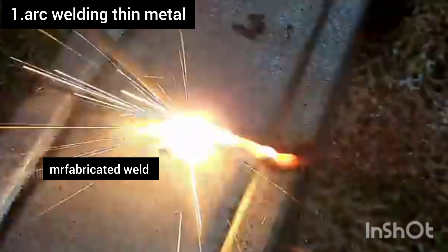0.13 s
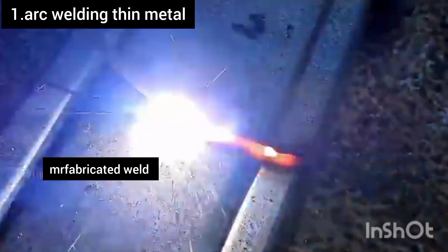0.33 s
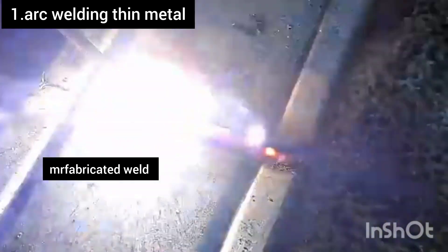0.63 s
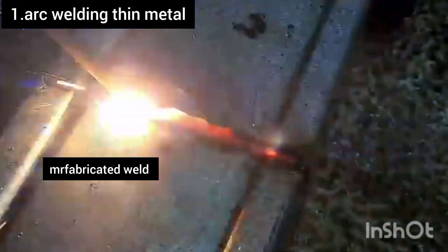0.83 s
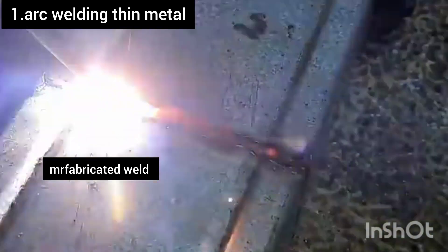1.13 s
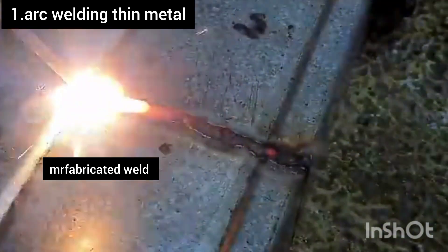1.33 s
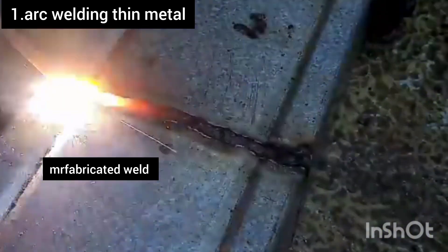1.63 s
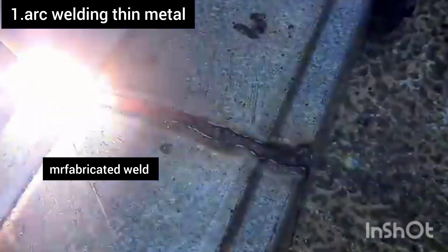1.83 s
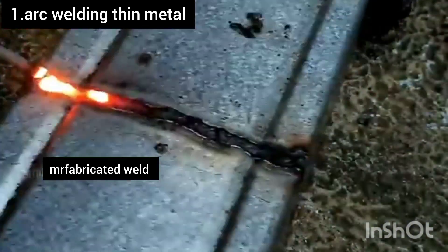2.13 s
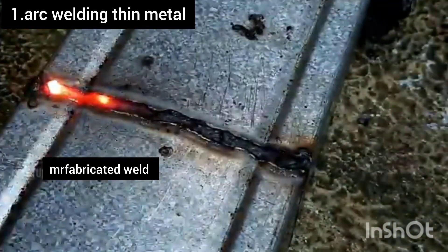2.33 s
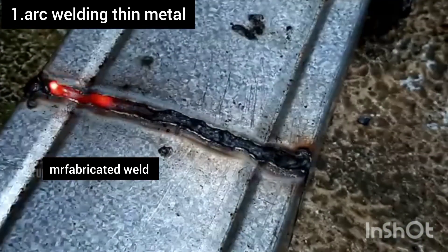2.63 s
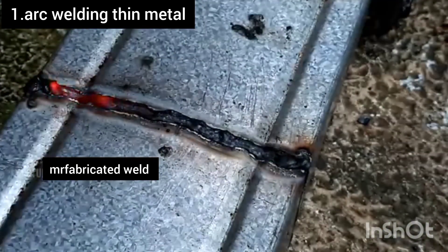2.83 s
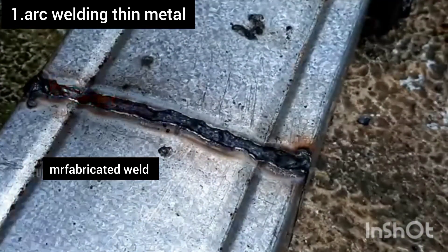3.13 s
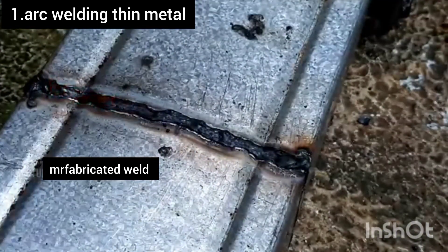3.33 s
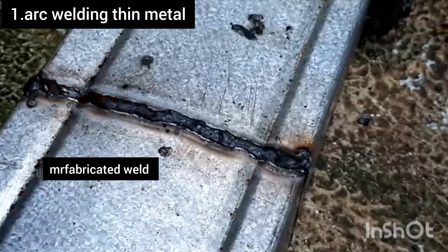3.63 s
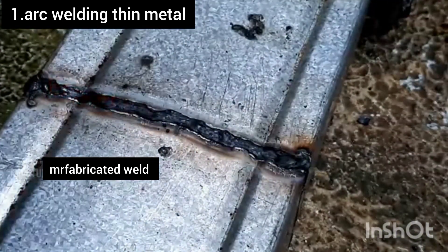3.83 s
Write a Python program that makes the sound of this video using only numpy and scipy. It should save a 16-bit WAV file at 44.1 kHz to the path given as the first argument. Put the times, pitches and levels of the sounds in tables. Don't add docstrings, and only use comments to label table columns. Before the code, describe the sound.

A welding arc sputters in sharp irregular bursts close to the microphone for two seconds, cuts off, scrapes and flashes once more, then a low fan rush rises with a double knock and tiny ticks.

```python
import sys
import numpy as np
from scipy import signal
from scipy.fft import rfft, irfft
from scipy.io import wavfile
from scipy.ndimage import uniform_filter1d, map_coordinates

SR = 44100
rng = np.random.default_rng(int(sys.argv[2]) if len(sys.argv) > 2 else 0)


def boost_factor(decibels):
    exponent = np.asarray(decibels, float) / 20
    return 10 ** exponent


def store_pcm(level_fs):
    pcm = np.round(np.clip(level_fs, -1, 1) * 32767).astype(np.int16)
    wavfile.write(sys.argv[1], SR, np.atleast_2d(pcm).T)


N = 176400
T = np.arange(N) / SR

# t/s, delay/ms
ARC_LAG = [(0, 0.13), (.3, .126), (.6, 0.138), (1.1, 0.152), (2.2, 0.156)]


def arc():
    # f/Hz, level/dB
    crackle_shape = [(1200, -29), (2800, -20), (4300, -1), (5600, -1.5), (8300, -2.5), (9500, 0),
                     (15300, -6.5), (16300, -68)]
    roar_shape = [(25, -13.5), (100, -1.5), (400, 1), (1000, -7.5), (1600, -7.5), (2700, -7), (3600, 6),
                  (5000, -78)]
    # f/Hz, coherence/1
    arc_same = [(30, 0.94), (200, 0.81), (3500, 0.68), (6000, 0.79), (15000, 0.1)]
    # f/Hz, level/dB
    arc_tilt = [(30, 3), (300, -1.5), (15000, 2.5)]
    sparks_per_s, spark_spread_db, spark_share = 7000, 2.5, 0.39
    roar_db, roar_end_s, roar_follows = -40, 1.975, 0.11

    level = effort()
    struck = rng.random(N) < sparks_per_s / SR
    sparks = boost_factor(spark_spread_db * np.minimum(rng.exponential(1, N), 4)) * struck
    signs = rng.choice([-1., 1.], (2, N))
    hiss = rng.standard_normal((2, N))
    grit = spark_share * evened(sparks) * signs + (1 - spark_share) * hiss
    crackle = evened(colour(grit, crackle_shape)) * level * boost_factor(2.5 * chance(0.002))

    burning = np.clip((roar_end_s - T) / 0.003, 0, 1) * uniform_filter1d(level, 600) ** roar_follows
    roar = evened(colour(rng.standard_normal((2, N)), roar_shape))
    roar = roar * burning * boost_factor(2.5 * chance(0.0098))

    both = ports(*(crackle + boost_factor(roar_db) * roar), arc_same, ARC_LAG)
    tilt = boost_factor(read(arc_tilt) / 2)
    return irfft(rfft(both) * [tilt, 1 / tilt], N)


def effort():
    # start t/s, length/s, strike level/dB, burn level/dB
    early_bursts = [(0.0289, 0.0062, -24, -52), (0.0374, 0.0092, -36, -32), (0.0554, 0.0032, -40, -38),
                    (0.0688, 0.011, -22, -27.5), (0.1492, 0.024, -33, -34), (0.1961, 0.022, -23.5, -29),
                    (0.2424, 0.0047, -33.5, -30), (0.2928, 0.031, -20.5, -37.5), (0.3193, 0.021, -31, -36),
                    (0.3362, 0.019, -21, -39.5), (0.3677, 0.011, -38, -35.5), (0.3806, 0.011, -47, -35),
                    (0.3901, 0.0087, -34, -27.5), (0.4185, 0.005, -31, -32), (0.434, 0.014, -21, -33),
                    (0.471, 0.028, -40, -31), (0.5035, 0.019, -23.5, -37), (0.5283, 0.023, -21, -35),
                    (0.5662, 0.014, -28, -34.5), (0.6206, 0.01, -25.5, -48), (0.6765, 0.0056, -27, -40),
                    (0.7263, 0.008, -25.5, -51), (0.7348, 0.0081, -50, -48), (0.7583, 0.0059, -34, -32),
                    (0.7957, 0.035, -38, -37)]
    late_bursts = [(0.8231, 0.021, -33, -33), (0.8486, 0.01, -31, -29.5), (0.9288, 0.0043, -33.5, -43),
                   (1.0805, 0.043, -29, -36.5), (1.1545, 0.031, -15.5, -31), (1.2152, 0.012, -31, -27.5),
                   (1.2297, 0.0049, -28, -33), (1.2586, 0.04, -28, -36.5), (1.4756, 0.023, -18.5, -38),
                   (1.5385, 0.0071, -28, -25.5), (1.5535, 0.026, -34, -36.5), (1.5909, 0.014, -28.5, -48),
                   (1.6063, 0.071, -31.5, -40), (1.7001, 0.027, -43.5, -34), (1.7326, 0.0031, -38, -17.5),
                   (1.7445, 0.012, -23, -60), (1.756, 0.011, -25, -29.5), (1.7735, 0.006, -48, -63),
                   (1.7915, 0.012, -23.5, -31.5), (1.807, 0.0096, -40, -31.5), (1.8239, 0.017, -25, -36),
                   (1.8418, 0.03, -43, -34.5), (1.8957, 0.041, -18, -30), (1.9414, 0.029, -15, -31.5),
                   (2.1935, 0.022, -19.5, -33)]
    # start t/s, length/s, strike level/dB, burn level/dB
    spits = [
        (1.3275, .003, -30, -45),
        (1.399, 0.012, -33, -39),
    ]
    # t/s, level/dB
    spatter = [(.0558, -34), (.1366, -29.5), (.2763, -36), (.445, -43), (.4559, -23.5), (.468, -30),
               (.512, -28), (.54, -39), (.551, -40), (.576, -32), (.598, -43), (.6639, -32), (.7103, -31.5),
               (.738, -31.5), (.8011, -33), (.8695, -33), (.8904, -34), (.9168, -44), (1.037, -30),
               (1.0879, -30), (1.108, -32), (1.146, -51), (1.27, -20), (1.287, -31), (1.299, -41),
               (1.3633, -33), (1.4546, -53), (1.486, -35), (1.543, -21.5), (1.62, -40), (1.6417, -28),
               (1.66, -26), (1.684, -35), (1.8725, -25), (1.961, -32)]
    # t/s, level/dB
    sizzle = [(0, -35), (.1, -48), (.14, -44), (.2, -52), (.45, -42.5), (.62, -52.5), (.9, -46), (1.0, -49),
              (1.04, -50), (1.3, -53), (1.35, -60), (1.4, -45.5), (1.65, -51), (1.96, -48), (1.995, -92)]

    snaps = laid(spatter, lambda db: swell(0.0015, 0.0024, db) ** 2)
    bursts = laid(list(early_bursts) + list(late_bursts) + spits, burst)
    steady = boost_factor(curve(sizzle) + 3.5 * chance(0.0041)) ** 2
    return np.sqrt(steady + bursts + snaps)


def burst(length, strike_db, burn_db):
    burn_rise_s, release_s, burn_change_db = 0.0064, 0.0017, -7.5
    t = T[:SR // 8]
    sag_db = burn_change_db * (np.clip(t / length, 0, 1) - 1)
    burn = boost_factor(burn_db + sag_db) * np.clip(t / burn_rise_s, 0, 1)
    power = (burn * np.exp(-np.clip(t - length, 0, 1) / release_s)) ** 2
    add(power, 0, swell(0.002, 0.0022, strike_db) ** 2)
    return power


def rod():
    # f/Hz, level/dB, t60/s
    steel = [(670, 12, 0.031), (1096, 7, 0.034), (1310, 5, 0.02), (1570, 6, .02), (1750, 3, 0.029),
             (2080, -0.5, 0.044), (2090, -19, 0.038), (2637, -7.5, 0.069), (3760, -36, .02)]
    # t/s, level/dB, f/Hz, t60/s
    knocks = [(.823, -35, 78, 0.048), (.8235, -39, 394, 0.031), (1.02, -32, 1140, 0.011),
              (2.195, -32.5, 527, 0.0088), (2.2135, -35, 1240, 0.028), (2.214, -32, 2690, 0.017),
              (2.214, -29, 480, 0.0092), (2.217, -36, 111, 0.033), (3.0262, -18, 610, 0.0096),
              (3.0265, -18.5, 3030, 0.0087), (3.0265, -24.5, 2200, .012), (3.03, -40, 500, 0.033),
              (3.154, -39.5, 1010, 0.015)]
    drag_start_s, sing_hz = 2.137, 1017

    slips = rng.standard_normal(N) * laid([(drag_start_s, 0.016, 0.019, -31)], swell)
    sing = laid([(drag_start_s, 0.024, 0.01, -28)], swell) * np.sin(2 * np.pi * sing_hz * T)
    body = np.diff(sum(ring(db, hz, t60) for hz, db, t60 in steel))
    drag = signal.oaconvolve(slips, body / np.linalg.norm(body))[:N]
    x = drag + sing + laid(knocks, knock)
    return ports(x, x, [(0, 0.72)], ARC_LAG)


def knock(db, hz, t60):
    contact_s = 0.00068
    return -ring(db, hz, t60) * np.minimum(T[:SR // 8] / contact_s, 1)


def ring(db, hz, t60):
    t = T[:SR // 8]
    return boost_factor(db - 60 * t / t60) * np.sin(2 * np.pi * hz * t)


def rustle():
    # start t/s, rise/s, fall/s, level/dB
    puffs = [(2.141, 0.0097, 0.05, -51), (2.5, 0.15, 0.59, -51), (2.64, 0.089, 0.0031, -45.5),
             (2.766, 0.0033, 0.017, -53), (2.838, 0.0028, 0.1, -53.5), (2.955, 0.0088, 0.0047, -50.5),
             (3.102, 0.0011, 0.012, -49), (3.235, .04, 0.038, -48.5), (3.517, 0.0027, 0.021, -47.5),
             (3.672, 0.0073, 0.013, -50), (3.86, 0.0036, 0.014, -53)]
    # f/Hz, level/dB
    rustle_shape = [(1200, -8), (2800, -2.5), (4600, -1.5), (7000, -5), (15300, -7), (16300, -42)]
    # t/s, level/dB, f/Hz
    ticks = [(2.768, -50, 5490), (2.768, -49, 7700), (2.768, -50, 8600), (2.768, -51, 11800),
             (2.768, -57, 13200), (2.768, -59, 14600), (2.958, -55, 5480), (2.958, -59, 8030),
             (2.958, -54, 12360), (3.103, -59, 7900), (3.103, -60, 11800), (3.146, -54, 3030),
             (3.146, -58.5, 5800), (3.142, -60, 12800), (3.518, -56, 10300), (3.518, -60.5, 11800),
             (3.518, -60, 13200), (3.518, -60, 14500), (3.518, -63, 5550), (3.676, -60, 8100),
             (3.676, -57, 13100), (3.676, -60, 14100), (3.862, -47.5, 4540), (3.862, -53, 11780),
             (3.862, -56, 10400)]

    level = laid(puffs, swell) * boost_factor(2.2 * chance(0.0097))
    hiss = evened(colour(rng.standard_normal((2, N)), rustle_shape))
    return level * hiss + laid(ticks, tick) * boost_factor(5 * chance(0.002))


def tick(db, hz):
    level = swell(0.0091 - 0.0002, 0.0091, db)
    return level * np.sin(2 * np.pi * hz * T[:len(level)])


def fan():
    # f/Hz, level/dB
    rush_shape = [(20, -22.5), (200, 0.5), (600, 1), (1100, -5), (2200, -7), (3100, -14.5), (15300, -30.5),
                  (16300, -71)]
    # f/Hz, level/dB
    whine_tones = [(204.6, -60), (709, -46.5), (1421, -66), (1822, -68), (2130, -63)]
    # t/s, level/dB
    whine_swell = [(0, -9), (2.55, -9.5), (2.72, -1), (3.0, -2), (3.15, -6), (3.3, 1), (3.54, -2.5),
                   (3.62, -4), (3.83, -4.5), (4, 5)]
    # t/s, level/dB
    gain = [
        (0, -21),
        (2.2, -7.5),
        (2.3, -11),
        (2.46, -7),
        (2.71, -2.5),
        (2.88, 0.5),
        (3.37, 0.5),
        (4, 0),
    ]
    # f/Hz, coherence/1
    fan_same = [(60, 1), (1500, 0.75), (4000, 0.53), (15000, 0.13)]
    # t/s, delay/ms
    fan_lag = [(0, 0.49)]
    rush_db, waver_db, width_hz = -45.5, 4.25, 2.04

    rush = evened(colour(rng.standard_normal((2, N)), rush_shape))
    air = boost_factor(rush_db) * rush * boost_factor(chance(0.015))
    whine = np.zeros(N)
    for hz, db in whine_tones:
        level = np.sqrt(2) * boost_factor(db + waver_db * chance(0.051))
        cycles = np.cumsum(hz + width_hz * chance(0.014)) / SR
        whine += level * np.sin(2 * np.pi * cycles)
    whine *= boost_factor(curve(whine_swell))
    return boost_factor(curve(gain)) * ports(*(air + whine), fan_same, fan_lag)


def room(x):
    t60_s = 0.073
    t = T[:SR // 4]
    tail = rng.standard_normal((2, len(t))) * boost_factor(-60 * t / t60_s) * (t > 0.002)
    return signal.oaconvolve(x, tail / np.linalg.norm(tail[0]), axes=1)[:, :N]


def ports(a, b, same, lag_ms):
    c = np.clip(read(same), 0, 1)
    late = map_coordinates(a, [np.arange(N) - curve(lag_ms) * SR / 1000], order=5)
    right = c * rfft(late) + np.sqrt(1 - c ** 2) * rfft(b)
    return np.array([a, irfft(right, N)])


def colour(x, spectrum):
    logs = np.log(boost_factor(np.maximum(read(spectrum), -80)))[::N // 4096][:2049]
    cep = irfft(logs)
    cep[1:2048] *= 2
    cep[2049:] = 0
    response = irfft(np.exp(rfft(cep)))
    return signal.oaconvolve(x, response[None], axes=1)[:, :N]


def swell(rise, fall, db):
    t = T[:int((rise + 8 * fall) * SR)]
    return boost_factor(db) * np.clip(t / rise, 0, 1) * np.exp(-np.clip(t - rise, 0, 1) / fall)


def chance(smooth_s):
    size = max(int(smooth_s * SR / 16), 1)
    slow = uniform_filter1d(uniform_filter1d(rng.standard_normal(N // 16 + 1), size), size)
    return np.interp(np.arange(N) / 16, np.arange(len(slow)), evened(slow))


def evened(x):
    return x / np.sqrt(np.mean(x ** 2) + 1e-20)


def curve(points):
    return np.interp(T, *np.transpose(points))


def read(points):
    f, value = np.transpose(points)
    return np.interp(np.log(np.fft.rfftfreq(N, 1 / SR) + 1), np.log(f + 1), value)


def add(mix, start, sound):
    part = mix[round(start * SR):][:len(sound)]
    part += sound[:len(part)]


def laid(rows, shape):
    out = np.zeros(N)
    for start, *rest in rows:
        add(out, start, shape(*rest))
    return out


def scene():
    near = arc() + rod() + rustle()
    return near + boost_factor(-9) * room(near) + fan()


def masked(x):
    arc_off_s, flash_s, flash_off_s = 1.96, 2.19, 2.225
    mask_db, reach_hz, notch_low_hz, notch_high_hz = -2.4, 480, 8700, 9900
    hz, at, (mid, side) = signal.stft([x[0] + x[1], x[0] - x[1]], SR, "cosine", 2048)

    def band_power(z):
        return np.repeat((abs(z[1:]) ** 2).reshape(64, 16, -1).mean(1), 16, axis=0)

    null_hz = 500 / np.interp(at, *np.transpose(ARC_LAG))
    burning = (at < arc_off_s) | (at > flash_s) & (at < flash_off_s)
    middle = np.repeat(hz[1:].reshape(64, 16).mean(1), 16)[:, None]
    near_null = (abs(middle - null_hz) < reach_hz) & burning
    in_notch = (middle > notch_low_hz) & (middle < notch_high_hz)
    weak = band_power(mid) < band_power(side) * boost_factor(2 * mask_db)
    mid[1:] *= ~(weak & (near_null | in_notch))
    mid, side = signal.istft(np.array([mid, side]), SR, "cosine", 2048)[1][:, :N]
    return np.array([mid + side, mid - side]) / 2


def band_limit(x):
    return signal.sosfilt(signal.butter(12, 16660, fs=SR, output="sos"), x)


def record(dry):
    # f/Hz, level/dB
    mic_response = [(8300, 0.5), (8900, 1), (9350, -3.5), (9900, -3), (10500, -3), (15900, 1), (16500, -30)]
    mix = masked(colour(dry, mic_response))
    return band_limit(mix)


dry = scene()
out = record(dry)
store_pcm(out)
```